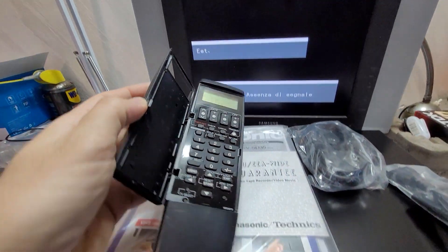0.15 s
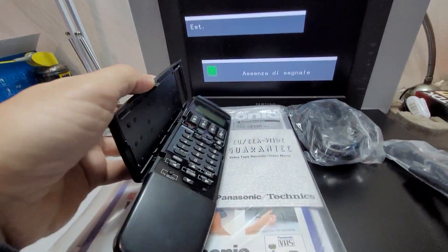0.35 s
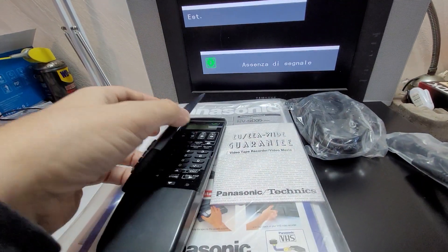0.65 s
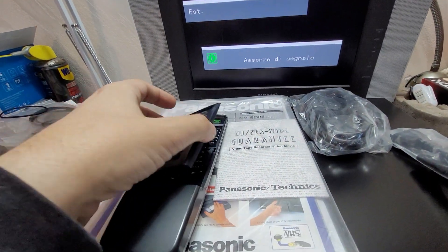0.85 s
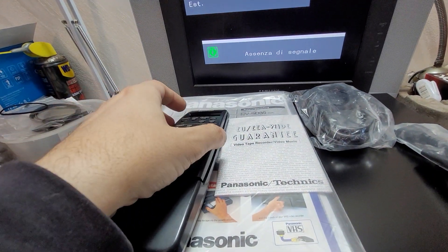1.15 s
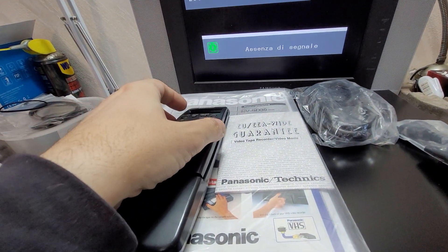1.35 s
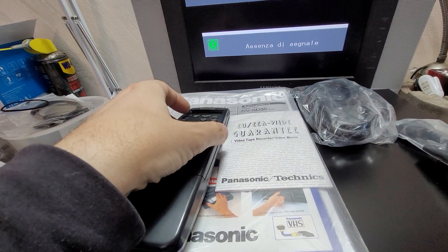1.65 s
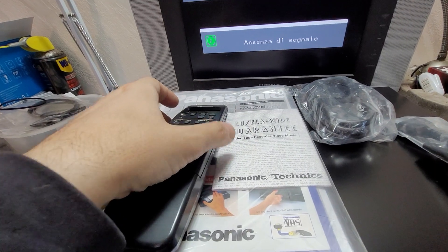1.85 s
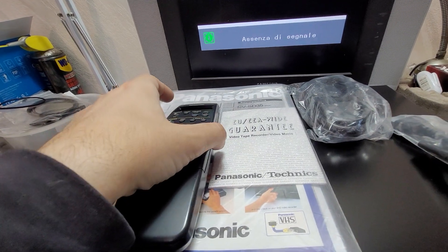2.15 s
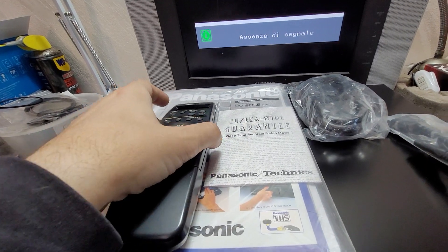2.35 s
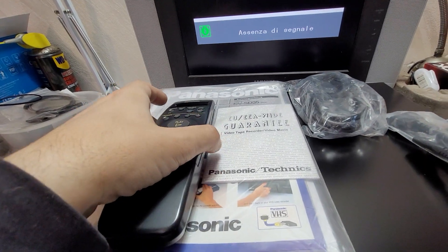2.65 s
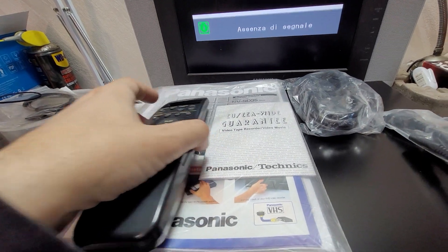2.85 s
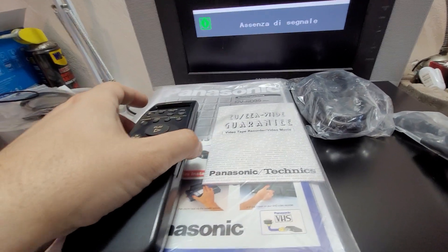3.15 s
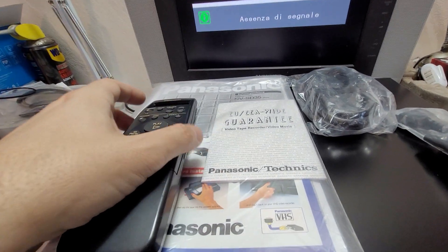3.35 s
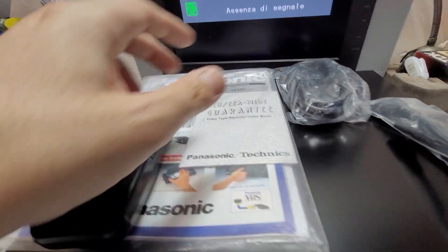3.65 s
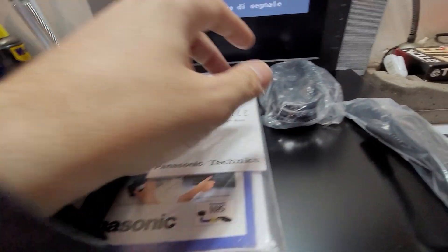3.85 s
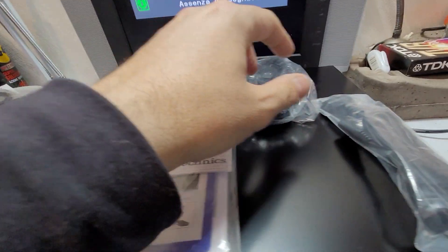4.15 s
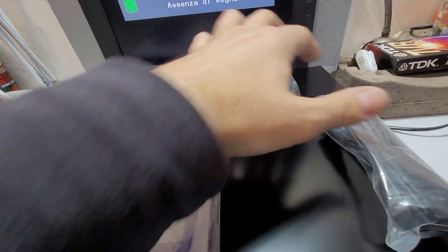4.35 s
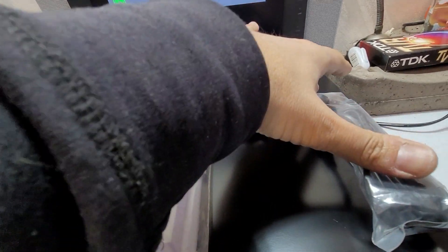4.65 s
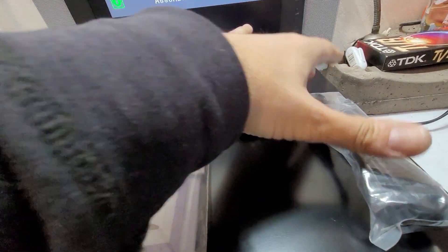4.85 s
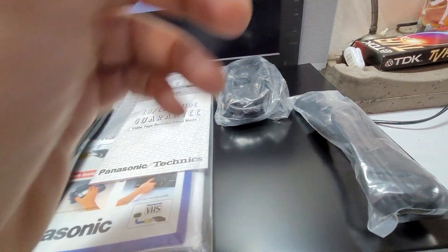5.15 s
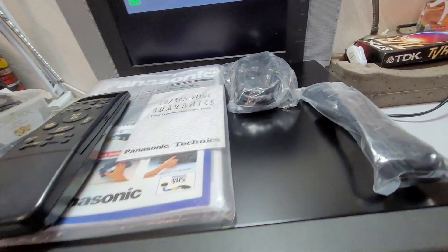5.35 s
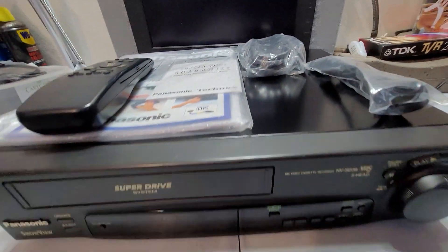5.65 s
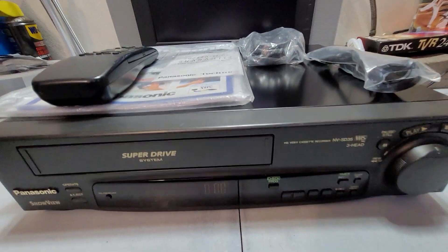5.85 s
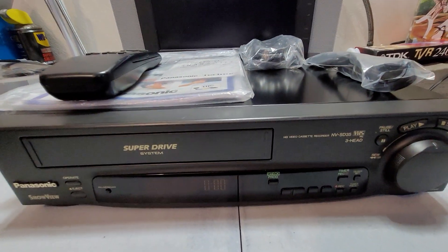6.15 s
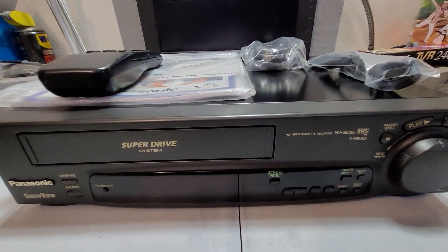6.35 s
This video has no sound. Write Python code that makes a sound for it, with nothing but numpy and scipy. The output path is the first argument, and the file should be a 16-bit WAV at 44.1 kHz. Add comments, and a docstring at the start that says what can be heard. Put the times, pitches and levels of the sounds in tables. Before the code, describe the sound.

A low mains hum and faint hiss fill a small room throughout. In the first half second, the hinge of a plastic remote control's flap creaks quietly, followed by tiny ticks. A firmer click comes at 1 second. The flap judders, then snaps shut loudly at about 1.6 seconds, ringing the plastic case and making the steel lid of the video recorder underneath boom. From 2 to 4 seconds there are only faint ticks, soft sleeve swishes and slight squeaks of skin on plastic, mostly to the right. Between 4.6 and 4.9 seconds a hand brushes a plastic bag, which crackles briefly over soft low thuds from the lid. Around 5.4 seconds a palm slides around the phone. A finger bumps the right microphone hard at 5.6 seconds, then adds smaller bumps and a close, rasping rub until about 6.5 seconds.

```python
"""A plastic remote control's flap judders, creaks and snaps shut, ringing the case and booming
the steel lid of the video recorder under it. A sleeve swishes and skin squeaks on the plastic.
A hand brushes a plastic bag, buckling its folds; a palm slides round the phone, then a finger
bumps and rubs the right microphone port. Small room, mains hum, faint hiss."""
import sys
import numpy as np
from scipy import signal
from scipy.fft import rfft, irfft
from scipy.io import wavfile
from scipy.ndimage import uniform_filter1d

SR = 44100
rng = np.random.default_rng(int(sys.argv[2]) if len(sys.argv) > 2 else 0)


def to_wav(s):
    """Save 16-bit WAV."""
    ch = np.atleast_2d(s).T  # columns
    pcm = np.round(np.clip(ch, -1, 1) * 32767)  # PCM
    wavfile.write(sys.argv[1], SR, pcm.astype(np.int16))


N = 287525
T = np.arange(N) / SR


def undb(db):
    """Decibels to gain."""
    return 10 ** (np.asarray(db) / 20)


def unit(x):
    """Scale to rms 1."""
    return x / np.sqrt(np.mean(x ** 2))


def unit_hit(x):
    """Scale each channel to the energy of 5 ms at rms 1."""
    return x / np.sqrt(np.sum(x ** 2, axis=-1, keepdims=True) / (SR * .005))


def fade(t, t60_s):
    """Exponential decay, 60 dB in t60_s."""
    return np.exp(-np.log(1000) * t / t60_s)


def pan(pan_db):
    """Stereo gains of constant total power; pan is left minus right throughout."""
    return unit(undb(np.array([[pan_db], [-pan_db]]) / 2))


def envelope(points):
    """Gain through (time [s], level [dB]) points."""
    return undb(np.interp(T, *np.transpose(points)))


def colour(x, points, size=8192):
    """Minimum-phase filter through (frequency [Hz], gain [dB]) points."""
    hz, db = np.transpose(points)
    bins_hz = np.maximum(np.arange(size // 2 + 1) * SR / size, 1)
    gain = undb(np.interp(np.log(bins_hz), np.log(hz), db))
    cepstrum = irfft(np.log(gain))
    cepstrum[1:size // 2] *= 2
    cepstrum[size // 2 + 1:] = 0
    response = irfft(np.exp(rfft(cepstrum)))
    return signal.fftconvolve(np.atleast_2d(x), response[None], axes=-1)[:, :x.shape[-1]]


def butter(x, hz, kind, order):
    """Butterworth low-pass or high-pass."""
    return signal.sosfilt(signal.butter(order, min(hz, SR / 2 - 1000), kind, fs=SR, output="sos"), x)


def burst(t, t60_s, spectrum):
    """Decaying, coloured stereo noise."""
    return colour(rng.standard_normal((2, len(t))) * fade(t, t60_s), spectrum)


def wander(rate_hz):
    """Smooth random motion, rms 1."""
    hold = int(SR / rate_hz)
    steps = np.repeat(rng.standard_normal(N // hold + 2), hold)
    return unit(uniform_filter1d(uniform_filter1d(steps, hold), hold)[:N])


def waver(hz, depth):
    """Tone of wandering level and phase."""
    drift = wander(9.1) + 1j * wander(6.7)
    return unit(np.real((1 + depth * drift) * np.exp(2j * np.pi * hz * T)))


def grains(per_s, spread_db, channels=2):
    """Tiny slips: impulses of random time and size."""
    shape = (channels, N)
    sizes = undb(spread_db * np.minimum(rng.exponential(size=shape), 4))
    return unit((rng.random(shape) < per_s / SR) * sizes * rng.standard_normal(shape))


def stroke(peak_s, length_s, roundness=1.53):
    """Speed of a hand movement: a symmetric bell."""
    distance = np.abs(T - peak_s) / (length_s / 2)
    return np.exp(-np.minimum(distance ** roundness / 2, 20))


def add(out, start_s, x):
    """Mix x in at start_s."""
    i = int(start_s * SR)
    out[:, i:i + x.shape[-1]] += x[:, :N - i]


# appliance hum (frequency [Hz], level [dB], waver depth [ratio])
HUM_TONES = [(100.5, -54, 0.13), (105.2, -60, 0.9), (145, -70.5, .5), (170, -74, .8), (203, -70, 0.24),
             (302.5, -66.5, .3)]
# deep drone (time [s], level [dB])
DRONE_LEVELS = [(0, -74), (.2, -52.5), (.55, -47), (.75, -63), (1.05, -51), (1.5, -52), (1.9, -68),
                (2.25, -53), (2.6, -65.5), (2.9, -46.5), (3.25, -58), (3.8, -50.5), (4.2, -59.5),
                (5, -72.5), (5.5, -60), (6.52, -65)]
# room rumble (frequency [Hz], gain [dB])
RUMBLE_EQ = [(20, -12.5), (45, -2.5), (100, 1.5), (240, 3), (400, -9), (800, -16), (1400, -33),
             (4000, -34.5), (15000, -55.5)]
# hiss (frequency [Hz], gain [dB])
HISS_EQ = [(40, 21), (400, 12), (1000, 8.5), (1700, -1), (2600, -5), (3200, 0.5), (4500, -8.5), (7500, -10),
           (10000, -15), (15500, -14.5)]


def background(rumble_db=-57, hiss_db=-60, drone_hz=56):
    """Appliance hum, a swelling drone and room rumble in mono, plus stereo hiss."""
    hum = sum(undb(db) * waver(hz, depth) for hz, db, depth in HUM_TONES)
    drone = envelope(DRONE_LEVELS) * waver(drone_hz, depth=.47)
    rumble = unit(colour(rng.standard_normal(N), RUMBLE_EQ))
    hiss = unit(colour(rng.standard_normal((2, N)), HISS_EQ))
    return hum + drone + undb(rumble_db) * rumble + undb(hiss_db) * hiss


# flap contacts (time [s], level [dB], treble edge [Hz], pan [dB])
FLAP_CLICKS = [ (0.0497, -51, 8200, 0), (0.395, -54, 7400, -10), (0.4450, -54.5, 5100, -5),
               (0.675, -54.5, 5400, -9), (0.6820, -51, 7700, -9), (0.7877, -46.5, 5200, -12),
               (0.8190, -53, 2200, -10), (1.0221, -29.5, 1800, -3.5), (1.0242, -26, 4200, -7.5),
               (1.3422, -38.5, 2590, -7), (1.465, -50, 2000, -3.5), (1.4820, -43.5, 2000, -2),
               (1.5108, -45, 2110, -4), (1.5334, -37, 2200, -6), (1.5550, -39, 2000, -8),
               (1.5596, -19.5, 2620, -10.5), (1.5662, -14.5, 2700, -9), (1.568, -13, 4400, 5.5),
               (1.5707, -16, 5570, -7.5), (1.8150, -53.5, 5160, -11), (2.0072, -57.5, 2980, -1.5),
               (2.2319, -56, 5510, -13.5), (2.3055, -50.5, 5520, -8), (2.3731, -45, 2790, -3.5),
               (2.4392, -52, 4980, -3), (2.9697, -52.5, 3710, -4), (3.3450, -58, 3400, -4.5),
               (3.4305, -56, 5000, -10)]
# plastic case ring (frequency [Hz], gain [dB], t60 [s])
CASE_MODES = [(430, -14, .025), (752, -5.5, .045), (1022, -1.5, .04), (1282, -3, 0.01), (1578, -12, .025),
              (1790, -7, .025), (1912, -6.5, 0.028), (2120, -7.5, .028), (2936, -4, 0.036),
              (3334, -2, 0.026), (3990, -5, 0.028), (4310, -4, .022), (5320, -3, 0.03), (6410, -5, 0.03)]
# dense, damped case modes (frequency [Hz], gain [dB])
KNOCK_EQ = [(150, -11.5), (450, -8), (620, -7.5), (950, 2), (1600, -5.5), (3500, -1), (7000, -3.5),
            (15000, -18.5)]
# latch edge tick (frequency [Hz], gain [dB])
TICK_EQ = [(500, -23), (2000, -5), (4500, 4.5), (7500, 1), (15000, -8.5)]


def remote(ring_db=-5, apart_hz=1700, detune=.01, tick_even_hz=5400, tick_db_per_oct=17, shade_db=-4):
    """Each slip or snap of the flap knocks and rings the case; harder contacts tick more."""
    out, t = np.zeros((2, N)), T[:SR // 8]
    hz, db, t60_s = np.transpose(CASE_MODES)[:, :, None]
    for time_s, level_db, edge_hz, pan_db in FLAP_CLICKS:
        strength = undb(db + 2 * rng.standard_normal(hz.shape)) * fade(t, t60_s)
        grip = 1 + detune * rng.standard_normal(hz.shape)  # fingers detune the case
        polarity = np.pi * rng.integers(0, 2, hz.shape)
        # short waves reach the two ports out of step
        phase = polarity + hz / apart_hz * rng.standard_normal((2, len(CASE_MODES), 1))
        ring = np.sum(strength * np.sin(2 * np.pi * hz * grip * t + phase), axis=1)
        knock = burst(t, t60_s=.018, spectrum=KNOCK_EQ)
        knock[1] += butter(knock[0] - knock[1], apart_hz, "low", order=1)
        body = butter(unit_hit(knock) + undb(ring_db) * unit_hit(ring), edge_hz, "low", order=3)
        body = pan(pan_db) * unit_hit(body)
        tick = burst(t, t60_s=.013, spectrum=TICK_EQ)
        tick = butter(tick, 5.5 * edge_hz, "low", order=4)
        tick = pan(pan_db + shade_db) * unit_hit(tick)  # the phone shades its left port
        tick_db = tick_db_per_oct * np.log2(edge_hz / tick_even_hz)
        add(out, time_s, undb(level_db) * (body + undb(tick_db) * tick))
    return out


# hinge stick-slip (time [s], level [dB], rasp re ring [dB])
HINGE_SLIPS = [(0.0700, -37.5, -2), (0.0835, -40, -4), (0.0970, -38.5, -11), (0.1115, -42, -6),
               (0.3555, -46, -8), (0.3660, -46.5, -15)]
# open flap ring (frequency [Hz], gain [dB], t60 [s])
FLAP_MODES = [(789, -0.5, 0.056), (880, -2, 0.025), (1180, -14, 0.02), (1370, -6.5, 0.043),
              (1690, -11.5, 0.032)]
# hinge scrape (frequency [Hz], gain [dB])
RASP_EQ = [(1500, -17), (2600, -11), (3500, -9), (4400, 3), (5500, -9), (6800, -12.5), (10000, -25)]


def hinge(pan_db=-5, rasp_t60_s=.057, apart_rad=.6):
    """Each slip of the hinge plucks the hollow flap and scrapes briefly."""
    out, t = np.zeros((2, N)), T[:SR // 8]
    hz, db, t60_s = np.transpose(FLAP_MODES)[:, :, None]
    phase = rng.uniform(0, 2 * np.pi, hz.shape) + apart_rad * rng.standard_normal((2, len(hz), 1))
    modes = undb(db) * fade(t, t60_s) * np.sin(2 * np.pi * hz * t + phase)
    ring = unit_hit(modes.sum(axis=1))
    for time_s, level_db, rasp_db in HINGE_SLIPS:
        rasp = unit_hit(burst(t, rasp_t60_s, RASP_EQ))
        add(out, time_s, undb(level_db) * pan(pan_db) * (ring + undb(rasp_db) * rasp))
    return out


# sleeve and hand strokes (peak time [s], length [s], right level [dB], pan [dB], sheen send [dB])
SLEEVE_STROKES = [ (0.236, 0.27, -58.5, -12, -20), (0.396, 0.09, -57.5, -14, -12.5),
                  (0.584, 0.16, -57, -11, -22), (0.997, 0.14, -57, -13, -34),
                  (2.043, 0.082, -59.5, -14, -17), (2.37, 0.12, -57.5, -11, -20),
                  (2.701, .13, -60.5, -11, -15), (2.95, 0.1, -57.5, -12, -7.5), (3.18, .1, -63, -12, -25),
                  (3.402, 0.058, -55.5, -13, -5.5), (3.663, 0.14, -56, -8.5, -18.5),
                  (4.16, 0.21, -59.5, -10, -18), (4.57, 0.056, -55.5, -9.5, -10),
                  (4.698, 0.068, -51.5, -18, -24), (5.36, 0.12, -57.5, -14.5, -31),
                  (6.344, 0.11, -53.5, 6.5, -17)]
# cloth swish (frequency [Hz], gain [dB])
SWISH_EQ = [(300, -13.5), (1200, -12), (2400, -7.5), (3200, -1), (3700, -2.5), (5000, -0.5), (7500, -4.5),
            (9000, -14), (15000, -25)]
# top-octave sheen (frequency [Hz], gain [dB])
SHEEN_EQ = [(4000, -27), (6000, -10.5), (8000, -2), (10500, 7.5), (15500, -5.5)]


def sleeve(stir_db=-65.5, stir_pan_db=-8, stir_send_db=-21, sheen_boost_db=9, flicker_db=1.43):
    """Cloth and skin slide over plastic in countless slips, stirring faintly between strokes."""
    swish_power = undb([[stir_db + stir_pan_db], [stir_db]]) ** 2
    sheen_power = swish_power * undb(stir_send_db) ** 2
    for peak_s, length_s, level_db, pan_db, send_db in SLEEVE_STROKES:
        power = (undb([[level_db + pan_db], [level_db]]) * stroke(peak_s, length_s)) ** 2
        swish_power = swish_power + power
        sheen_power = sheen_power + power * undb(send_db) ** 2
    swish = unit(colour(grains(per_s=14000, spread_db=-1.5), SWISH_EQ))
    sheen = undb(sheen_boost_db) * unit(colour(grains(per_s=6000, spread_db=1), SHEEN_EQ))
    return (np.sqrt(swish_power) * swish + np.sqrt(sheen_power) * sheen) * undb(flicker_db * wander(45))


# pushes on the lid (time [s], level [dB])
LID_PUSHES = [(0.486, -54.5), (1.024, -45.5), (1.570, -26), (4.189, -53.5), (4.587, -57), (4.851, -46)]
# steel lid ring (frequency [Hz], gain [dB], t60 [s])
LID_MODES = [(38.4, -12.5, .25), (55.5, -6.5, .3), (84.4, -11.5, 0.95), (98.7, 5.5, 0.26), (111, -14, .18),
             (169.5, -9, 0.51), (250, -9, 0.21), (323, -12.5, 0.32), (367, -6, 0.13), (495, -20.5, .06),
             (755, -9, 0.06), (1055, -18.5, 0.32)]


def lid(swell_cycles=.9):
    """The steel lid booms when pushed; its lowest modes build slowest."""
    out, t = np.zeros((2, N)), T[:SR]
    boom = 0
    for hz, db, t60_s in LID_MODES:
        swell = 1 - np.exp(-t * hz / swell_cycles)
        boom = boom + undb(db) * swell * fade(t, t60_s) * np.sin(2 * np.pi * hz * t)
    boom /= boom[:SR // 20].std()
    for time_s, level_db in LID_PUSHES:
        add(out, time_s, undb(level_db) * boom[None])
    return out


# skin on plastic (peak time [s], length [s], pitch [Hz], level [dB])
SKIN_SQUEAKS = [(0.96, .08, 1670, -64.5), (2.967, 0.049, 4730, -60), (3.24, .025, 1700, -65.5),
                (3.412, 0.065, 4770, -56.5), (4.18, 0.028, 1900, -61)]


def squeaks(q=9, pan_db=-6):
    """Skin catches in coarse slips, each ringing briefly."""
    slips = grains(per_s=670, spread_db=1)
    out = np.zeros((2, N))
    for peak_s, length_s, hz, level_db in SKIN_SQUEAKS:
        ring = unit(signal.lfilter(*signal.iirpeak(hz, q, fs=SR), slips))
        out += undb(level_db) * stroke(peak_s, length_s) * ring
    return pan(pan_db) * out


# buckling folds (time [s], level [dB], centre [Hz], pan [dB])
FOLD_SNAPS = [(4.5872, -35, 1440, 3), (4.5877, -30, 3900, -14), (4.6038, -49, 2500, -7),
              (4.6529, -40, 3730, -12), (4.665, -44, 11000, -19), (4.6790, -50, 6000, -16),
              (4.696, -39.5, 11000, -21), (4.736, -34.5, 13100, -16), (4.7363, -36, 5860, -15),
              (4.7420, -39.5, 5900, -10), (4.767, -50, 6000, -23), (4.8425, -33.5, 3800, -11),
              (4.844, -38.5, 950, 0), (4.8646, -42.5, 2670, -5), (5.3144, -44.5, 2640, -6.5),
              (5.478, -45, 5440, 4)]
# fold spectrum (frequency / centre [ratio], gain [dB])
FOLD_EQ = [(0.079, -15.5), (.25, -9.5), (0.549, -4), (1, 0.5), (1.7, -9), (3, -17.5), (6, -37)]


def bag_folds(snap_t60_s=.007, flutter_t60_s=.07, flutter_db=-19):
    """A fold snaps through and the film flutters after it."""
    out, t = np.zeros((2, N)), T[:SR // 10]
    decay = fade(t, snap_t60_s) + undb(flutter_db) * fade(t, flutter_t60_s)
    for time_s, level_db, centre_hz, pan_db in FOLD_SNAPS:
        spectrum = [(ratio * centre_hz, db) for ratio, db in FOLD_EQ]
        snap = colour(rng.standard_normal((2, len(t))) * decay, spectrum)
        add(out, time_s, undb(level_db) * pan(pan_db) * unit_hit(snap))
    return out


def bag_creases(peak_s=4.68, length_s=.11, level_db=-58, centre_hz=4200, pan_db=-13):
    """Small creases give way as the hand passes over the bag."""
    spectrum = [(ratio * centre_hz, db) for ratio, db in FOLD_EQ]
    creases = unit(colour(grains(per_s=400, spread_db=6), spectrum))
    return undb(level_db) * pan(pan_db) * stroke(peak_s, length_s) * creases


# palm on the phone's case (peak time [s], length [s], right level [dB], pan [dB])
PALM_STROKES = [(5.416, 0.11, -51, -16), (5.55, 0.18, -47.5, -5), (5.67, 0.045, -48, -13),
                (5.907, 0.25, -51.5, -8)]
# palm friction (frequency [Hz], gain [dB])
PALM_EQ = [(400, 1.5), (1500, -13), (3000, -6.5), (4500, -8.5), (6000, 0.5), (7500, -1), (10000, -3),
           (12000, -3), (15500, -16)]


def palm(flicker_db=.5):
    """The hand slides round the phone: a close, bright brushing of skin."""
    power = sum((undb([[level_db + pan_db], [level_db]]) * stroke(peak_s, length_s)) ** 2
                for peak_s, length_s, level_db, pan_db in PALM_STROKES)
    flicker = undb(flicker_db * wander(60))
    brush = unit(colour(grains(per_s=9900, spread_db=-.2), PALM_EQ))
    return np.sqrt(power) * flicker * brush


# short fingertip skids (start [s], hold [s], level [dB])
FINGER_SKIDS = [(5.569, .016, -36.5), (5.585, 0.004, -29.5), (5.67, 0.02, -43.5), (5.819, 0.01, -41),
                (5.866, 0.026, -50.5), (5.941, 0.031, -46.5), (5.993, 0.019, -49.5), (6.056, 0.038, -48.5),
                (6.458, 0.043, -45.5)]
# long fingertip drag (time [s], level [dB])
FINGER_DRAG = [(6.098, -48), (6.127, -30.5), (6.167, -42.5), (6.172, -30.5), (6.29, -32.5), (6.348, -23),
               (6.38, -30), (6.405, -40.5), (6.44, -54)]
# skin friction at the port (frequency [Hz], gain [dB])
SKIN_EQ = [(40, -5), (150, -6), (300, -1.5), (550, 2.5), (1200, -3), (2500, -11.5), (4500, -14.5),
           (6500, -13), (11000, -14.5), (15500, -23)]


def finger_rub(attack_s=.006, release_t60_s=.059, boost_db=1, flicker_db=1):
    """Fingertip ridges rasp across the port: one drag, and skids that catch, hold and let go."""
    force = envelope(FINGER_DRAG) * (T > FINGER_DRAG[0][0]) * (T < FINGER_DRAG[-1][0])
    for start_s, hold_s, level_db in FINGER_SKIDS:
        attack = np.clip((T - start_s) / attack_s, 0, 1)
        release = fade(np.maximum(T - start_s - hold_s, 0), release_t60_s)
        force += undb(level_db) * attack * release
    rasp = unit(colour(grains(per_s=9000, spread_db=-1, channels=1), SKIN_EQ))
    return force * undb(boost_db + flicker_db * wander(90)) * rasp


# fingertip landings (time [s], level [dB], half width [ms], relative grit [dB])
FINGER_BUMPS = [(5.575, -21, 0.12, -7.5), (5.5918, -15, 0.13, -8), (5.5933, -2.5, 0.28, -17.5),
                (5.6854, -14.5, 0.34, -22), (5.7175, -17.5, 0.28, -20), (5.828, -24.5, 0.2, -16.5),
                (5.952, -34, 1, -8.5), (6.0645, -22, 0.42, -21)]


def finger_bumps(leak_hz=45, grit_t60_s=.016, grit_hz=3000, pad_hz=72, pad_t60_s=.12, pad_db=-21):
    """A fingertip squeezes and releases the air in the port; its soft pad settles with a thud."""
    out, t = np.zeros((1, N)), T[:SR // 8]
    lead_s = .005
    after_s = np.maximum(t - lead_s, 0)
    thud = undb(pad_db) * np.sin(2 * np.pi * pad_hz * after_s) * fade(after_s, pad_t60_s)
    for time_s, level_db, half_ms, grit_db in FINGER_BUMPS:
        half_widths = (t - lead_s) * 1000 / half_ms
        pressure = -half_widths / (1 + half_widths ** 2 / 3) ** 2
        pressure = butter(pressure / pressure.max(), leak_hz, "high", order=1)
        contact = (half_widths > -1) * fade(after_s, grit_t60_s)
        grit = colour(rng.standard_normal(len(t)) * contact, SKIN_EQ)
        grit = unit_hit(butter(grit, grit_hz, "high", order=1))
        add(out, time_s - lead_s, undb(level_db) * (pressure + thud + undb(grit_db) * grit))
    return out


# reverberation bands (frequency [Hz], t60 [s], gain [dB])
ROOM_BANDS = [(200, 0.44, 2.5), (500, 0.3, 3), (1000, 0.12, -1.5), (1996, 0.47, -4), (4000, 0.48, -4.5),
              (7000, 0.46, -2.5), (11000, 0.31, -1), (15000, .2, -7.5)]


def room(x, wet_db=-10, build_s=.006, pan_db=-5):
    """Diffuse small-room echoes, decaying per band; both sides feed both ports."""
    t = T[:SR * 3 // 4]
    noise = rfft(rng.standard_normal((2, 2, len(t))))
    log_hz = np.log(np.maximum(np.arange(noise.shape[-1]) * SR / len(t), 1))
    hz, t60_s, db = np.transpose(ROOM_BANDS)
    tail = 0
    for k, weights in enumerate(np.eye(len(hz))):
        shape = fade(t, t60_s[k]) * (1 - np.exp(-t / build_s))
        band = irfft(noise * np.interp(log_hz, np.log(hz), weights), len(t))
        tail = tail + undb(db[k]) * band * shape / np.sqrt(np.sum(shape ** 2))
    echoes = signal.fftconvolve(x[None], tail, axes=-1)[..., :N].sum(axis=1) / np.sqrt(2)
    return undb(wet_db) * pan(pan_db) * echoes


def scene(finger_left_db=-36):
    """Remote and bag echo in the room; the rest is dry, with the finger at the right port."""
    plastic = hinge() + remote() + bag_folds() + bag_creases()
    mix = plastic + room(plastic) + lid() + sleeve() + squeaks() + palm()
    finger = (finger_bumps() + finger_rub()) * undb([[finger_left_db], [0]])
    return mix + finger + background()


# microphone response with port notch (frequency [Hz], gain [dB])
MIC_EQ = [(20, -6), (50, -1.5), (7000, 0), (7900, -5.5), (8500, -17.5), (9100, -17.5), (10000, -8.5),
          (16000, -6.5)]


def record(dry, ceiling=.9, top_hz=16000):
    """Phone microphone: treble notch from the ports, soft clip, low-pass."""
    x = colour(dry, MIC_EQ)
    x = x / (1 + (x / ceiling) ** 6) ** (1 / 6)
    return signal.sosfilt(signal.ellip(8, .2, 70, top_hz, fs=SR, output="sos"), x)


dry = scene()
out = record(dry)
to_wav(out)
```